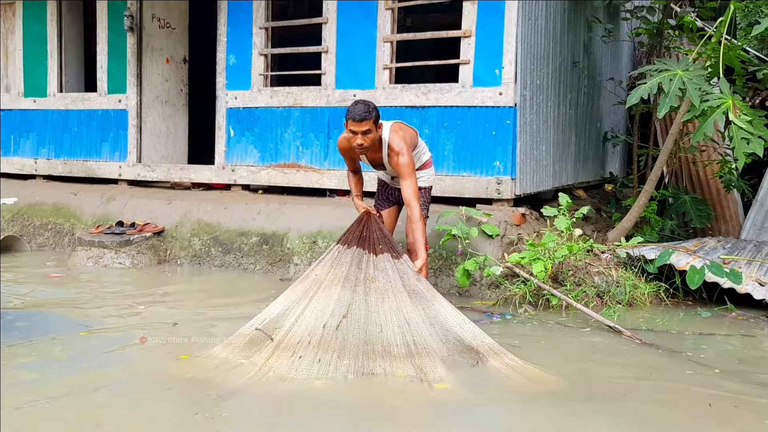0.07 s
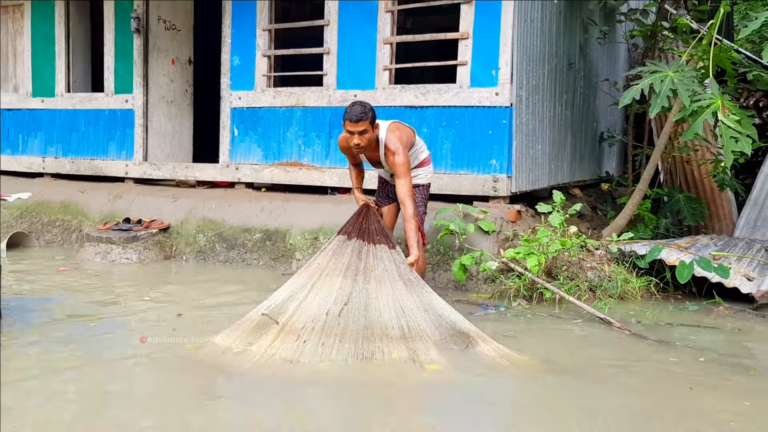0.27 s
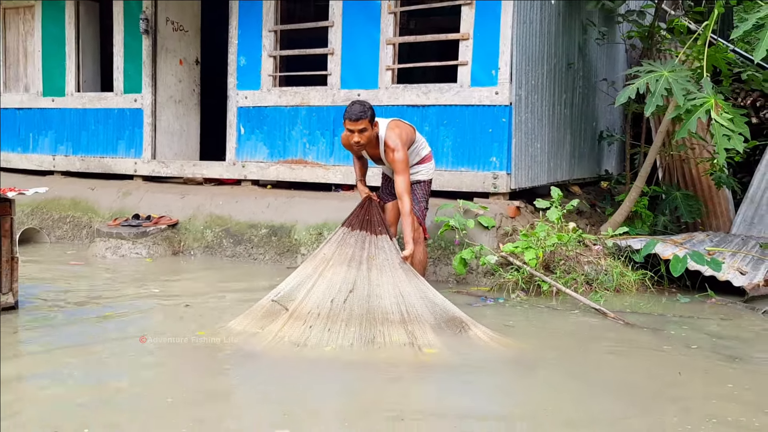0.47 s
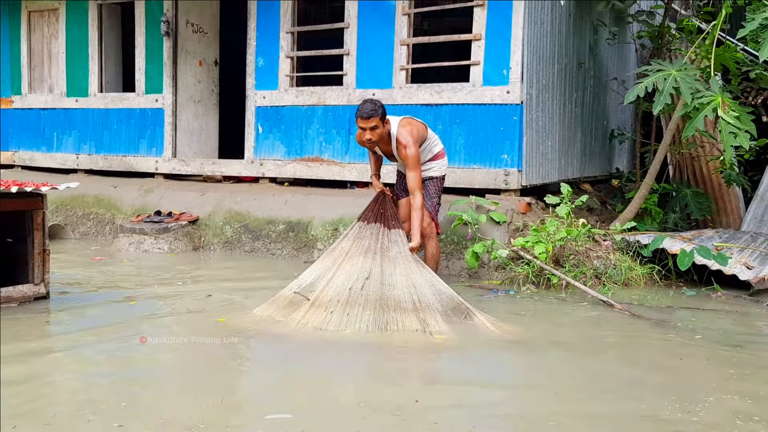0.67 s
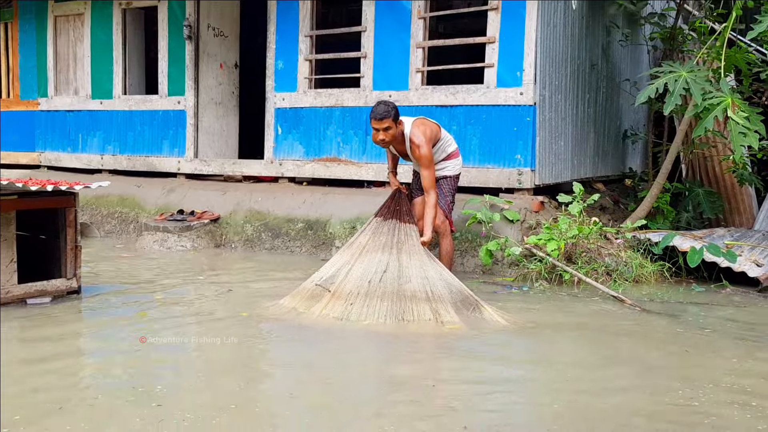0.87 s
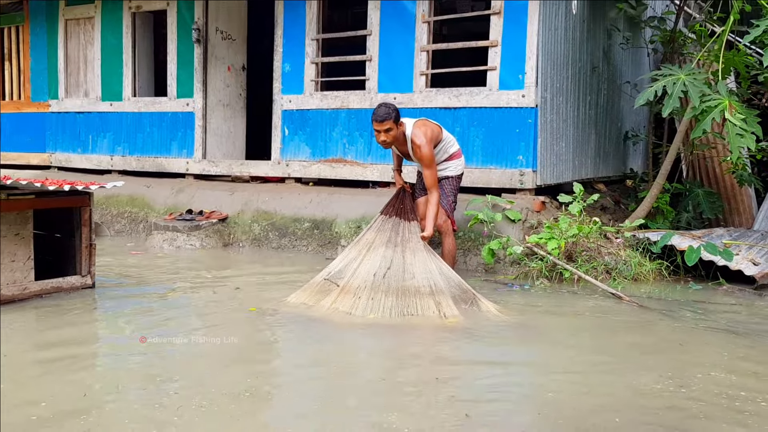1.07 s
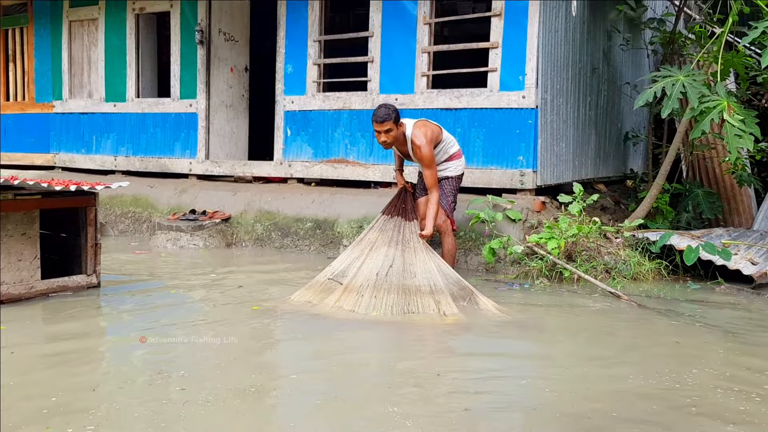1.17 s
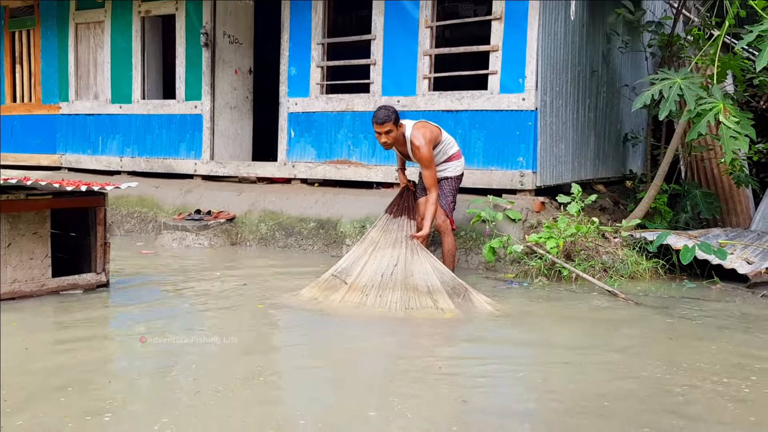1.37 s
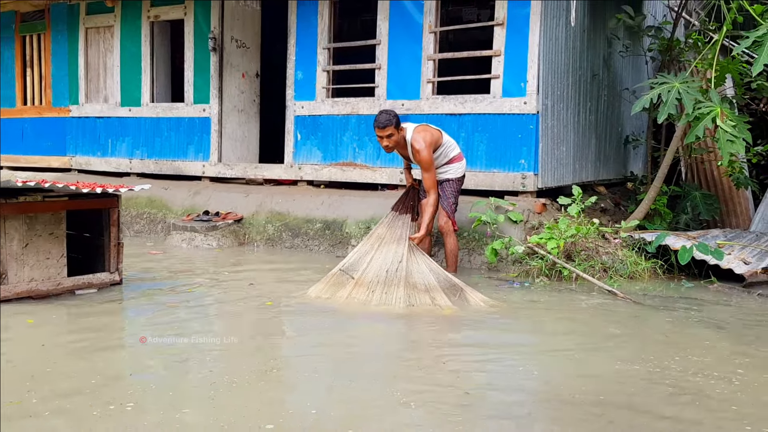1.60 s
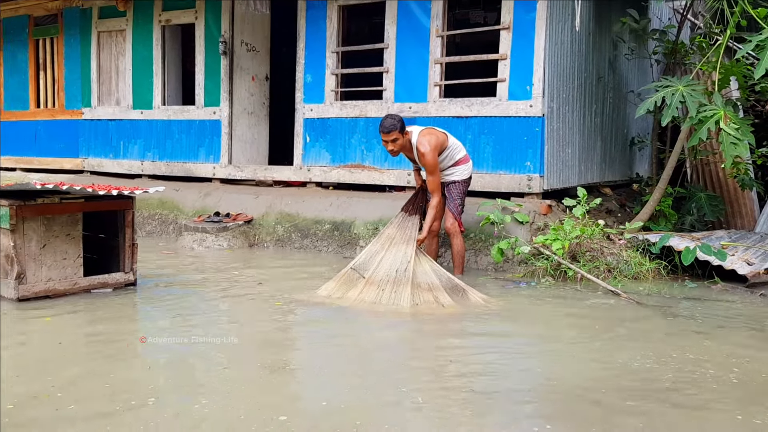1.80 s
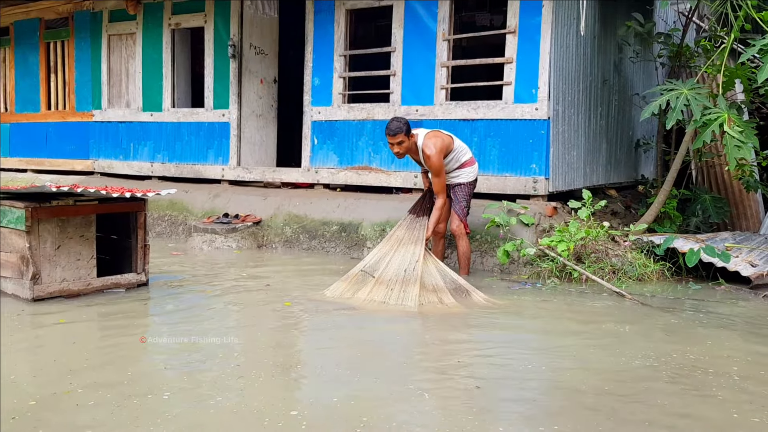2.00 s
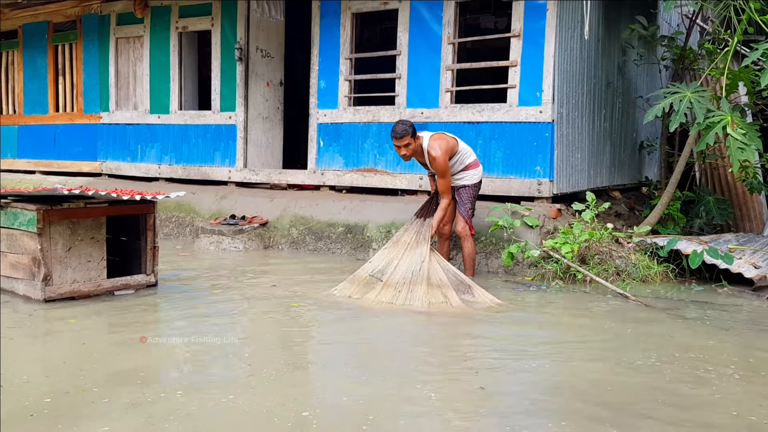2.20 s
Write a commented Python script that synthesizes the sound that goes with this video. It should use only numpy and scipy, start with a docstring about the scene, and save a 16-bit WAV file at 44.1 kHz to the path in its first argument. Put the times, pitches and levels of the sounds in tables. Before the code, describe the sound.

Shallow water sloshes and gurgles as a net is drawn in outdoors, a few metres from the microphone. Light drips lead into one splashy pull and a slightly softer second, then scattered drops fall back over quiet open air.

```python
"""Light drips and bubbling, then a cast net hauled through shallow floodwater in two pulls.
A few metres from a stereo pair of microphones, each pull churns up deep gulps and a crowd of
bubbles while spray patters off the mesh; afterwards single drips plop back. A house wall returns
a short wash. Behind it all lie a low outdoor rumble and two faint, far whistles."""
import sys
import numpy as np
from scipy import signal
from scipy.fft import rfft, irfft
from scipy.io import wavfile

SR = 44100
rng = np.random.default_rng(int(sys.argv[2]) if len(sys.argv) > 2 else 0)


def output_pcm(signal):
    """Save a mono or channel-first signal as 16-bit PCM at the path in sys.argv[1].

    Samples are clipped to [-1, 1] before scaling.
    """
    pcm = np.clip(np.atleast_2d(signal).T, -1, 1) * 32767
    wavfile.write(sys.argv[1], SR, np.round(pcm).astype(np.int16))


N = 99225
TIME = np.arange(N) / SR
HZ = np.fft.rfftfreq(N, 1 / SR)

# Table levels are relative: each layer's gain and placing come on top.
# outdoor rumble and hiss: frequency_hz, level_db
AIR_SPECTRUM = [(20, -48), (40, -10.5), (68, -2), (95, -1.5), (130, -10.5), (200, -9.5), (400, -16.5),
                (1000, -25), (2500, -43), (6000, -33.5), (9000, -35), (12500, -28.5), (16000, -35)]
# how alike the air is at the two microphones: frequency_hz, correlation
AIR_LIKENESS = [(30, 0.74), (80, 1), (200, 0.11), (1000, 0.067), (4000, 0.057), (16000, .05)]
# soft thuds and hollow rings of heaving water: start_s, pitch_hz, level_db, decay_s, glide_share
WATER_THUDS = [(.316, 663, -10.5, 0.0038, -0.027), (.345, 446, -26, 0.028, -0.018),
               (0.582, 171, -23, 0.0057, .1), (.805, 269, -29, 0.015, 0.12), (1.8, 61, -29.5, 0.019, -.1),
               (2.039, 77.4, -32.5, 0.028, -0.017)]
# far whistles: start_s, length_s, start_pitch_hz, end_pitch_hz, level_db, pure_tone_gain
FAR_WHISTLES = [(1.567, .2, 2397, 3494, -38.5, 0.7), (1.708, 0.232, 4650, 4880, -43.5, .35)]
# tail scattered around the yard: frequency_hz, level_db
YARD_SPECTRUM = [(100, -10), (400, -9), (1000, -1.5), (2500, -6), (16000, 0.5)]
# where the water sits between the microphones: frequency_hz, left_over_right_db
WATER_BALANCE = [(100, 6), (400, 1.1), (1000, 2), (2000, 2), (3500, 1.5), (6000, 1), (9500, 5), (12500, -2),
                 (15000, -6)]
# spray off the mesh: time_s, level_db
SPRAY_ENVELOPE = [(0, -43), (.09, -43.5), (.12, -50), (.195, -44), (.22, -32), (.35, -25), (.44, -26),
                  (.55, -26.5), (.62, -26.5), (.78, -24), (.86, -27), (.945, -37), (1.015, -32.5),
                  (1.08, -31), (1.4, -29.5), (1.55, -37), (1.8, -47), (2.25, -48.5)]
# tone of the spray: frequency_hz, level_db
SPRAY_SPECTRUM = [(300, -14), (1200, -5), (2600, -1.5), (3800, -2.5), (5200, -7), (7000, -11.5),
                  (8500, -9.5), (11000, -10), (13000, -7), (16000, -19)]
# drops and sheets hitting the surface: start_s, level_db, decay_s, left_over_right_db, centre_hz
SURFACE_SMACKS = [(.209, -21, 0.002, 2, 5550), (0.207, -18, 0.0033, 3, 2630),
                  (.278, -19, 0.00091, -2, 13500), (0.303, -15, 0.0091, 5, 1920),
                  (0.307, -13.5, 0.0083, 1, 3520), (0.351, -16.5, 0.0029, 4, 6660),
                  (0.435, -6, 0.0031, 2, 740), (0.436, -18, .004, -5, 4000), (0.502, -18, 0.0038, 11, 8700),
                  (.573, -18, 0.0022, 7, 7800), (.620, -15.5, .003, -1, 3660),
                  (0.647, -17, 0.0021, 6, 8900), (0.698, -13, 0.0019, 5, 5060),
                  (0.736, -12, 0.0022, -2, 4300), (0.752, -12.5, 0.0025, 3, 9800),
                  (0.7659, -16, 0.0022, 12.5, 7800), (0.823, -20, 0.0009, 9, 12500),
                  (0.912, -19.5, 0.0045, 3, 4260), (.9613, -22, 0.0035, 0, 12000),
                  (0.988, -31, .0015, 0, 12500), (0.993, -31, .003, -3, 10000),
                  (1.034, -21, 0.0027, -5, 13000), (1.078, -27, 0.0088, 3, 1000),
                  (1.0824, -22.5, 0.0085, -2, 9800), (1.093, -18.5, 0.0028, 1, 5740),
                  (1.125, -23, 0.0051, -3, 5970), (1.154, -18.5, 0.0039, -1, 5000),
                  (1.1583, -23, 0.0012, -12, 13100), (1.1921, -21, 0.0043, -5, 6240),
                  (1.223, -19, 0.013, -2, 2070), (1.281, -16, 0.0012, 3, 9200),
                  (1.404, -15.5, 0.0029, -5, 2750), (1.462, -15, 0.0007, -7, 12300),
                  (1.682, -27, 0.0087, 2, 950), (1.7233, -28, .001, -5, 12500),
                  (1.759, -27, .001, -12, 11000), (1.988, -30, 0.012, -3, 2580),
                  (2.0124, -16.5, 0.0018, -7, 11200), (2.0136, -19, 0.001, 3, 4130)]
# large single bubbles and drips: start_s, pitch_hz, level_db, decay_s, glide_share
SINGLE_PLOPS = [(0.009, 1090, -28.5, 0.013, 0.22), (0.0944, 1424, -27.5, 0.0061, -0.038),
                (0.1279, 640, -31.5, 0.021, -0.049), (0.2045, 1545, -23, 0.011, -0.24),
                (0.215, 1440, -13.5, 0.0013, -0.15), (0.2268, 2044, -13, 0.0035, 0.098),
                (0.2492, 2000, -20, 0.0015, 0.022), (0.2737, 1567, -18, 0.0059, 0.11),
                (0.309, 1590, -6.5, 0.0013, -0.32), (0.31, 472, -7, 0.011, -0.16),
                (0.3104, 704, -0.5, 0.0015, -0.063), (0.3518, 1410, -1.5, 0.002, 0.11),
                (0.3993, 1190, -11.5, 0.0018, -0.039), (0.442, 906, -11, 0.014, 0.19),
                (0.4714, 922, -13, 0.011, -0.0075), (0.5023, 1160, -10, 0.0081, -0.13),
                (0.5824, 318, -7, 0.012, 0.25), (0.588, 668, -11, 0.013, -0.063),
                (0.6198, 1012, -3, 0.004, 0.017), (0.641, 538, -7, 0.0058, -0.14),
                (0.6664, 614, -12, 0.0065, 0.25), (0.6832, 2420, -9.5, 0.0014, 0.1),
                (0.6848, 910, -15, 0.011, -0.086), (0.72, 820, -13, 0.0055, 0.02),
                (0.7514, 445, -10.5, 0.0047, -0.16), (0.765, 1390, -17.5, 0.017, 0.34),
                (0.7792, 356, -15.5, 0.0075, -0.18), (0.7823, 832, -12, 0.0062, 0.26),
                (0.7993, 1180, -10, 0.0018, -0.18), (0.8508, 990, -11.5, 0.0031, 0.042),
                (0.9651, 870, -12, 0.0028, 0.25), (0.983, 1690, -17, 0.0028, 0.13),
                (0.998, 1490, -18, 0.008, 0.066), (1.0468, 1020, -14.5, 0.0018, -0.12),
                (1.078, 825, -14, 0.005, -0.22), (1.204, 400, -13.5, 0.004, -0.2),
                (1.207, 1960, -12, 0.002, -0.047), (1.2293, 1850, -9, 0.0032, -0.11),
                (1.246, 920, -14.5, 0.0075, 0.0079), (1.2784, 405, -13, 0.011, -0.12),
                (1.28, 1250, -11, 0.0022, -0.23), (1.323, 977, -11.5, 0.0052, 0.031),
                (1.354, 427, -7.5, 0.0051, 0.066), (1.3844, 438, -12, 0.01, -0.03),
                (1.4119, 1020, -6, 0.0034, 0.083), (1.4623, 1140, -10.5, 0.0021, 0.2),
                (1.4976, 990, -11, 0.0034, -0.041), (1.6244, 1880, -21, 0.0029, 0.0075),
                (1.6827, 704, -26.5, 0.011, -0.0072), (1.7244, 1800, -27, 0.0021, 0.096),
                (1.7613, 1950, -32, 0.016, 0.11), (1.7922, 853, -21.5, 0.007, 0.2),
                (1.839, 524, -24, 0.0073, 0.14), (1.9948, 2500, -21, 0.0013, -0.043),
                (2.0482, 2590, -30, 0.0025, 0.074), (2.0948, 1630, -32, 0.0033, -0.033),
                (2.1512, 1365, -21, 0.0028, -0.051), (2.1944, 867, -13.5, 0.0036, -0.3),
                (2.205, 742, -23, 0.013, 0.18), (2.215, 1860, -33.5, 0.011, -0.23)]
# knots of bubbles that break together: middle_s, length_s, pitch_hz, level_db
BUBBLE_KNOTS = [(0.234, 0.039, 2150, -29.5), (.35, 0.0082, 1550, -18), (0.43, 0.028, 1170, -20.5),
                (.8, 0.019, 1630, -22), (.922, .02, 1760, -32.5), (1.028, 0.034, 1930, -27.5),
                (1.088, 0.027, 2200, -30), (1.111, 0.0095, 1760, -26), (1.169, 0.02206, 1090, -23.5),
                (1.233, 0.022, 1820, -24.5), (1.289, 0.031, 840, -30), (1.398, .025, 1090, -33),
                (1.446, 0.036, 390, -32.5), (1.828, 0.048, 890, -40), (1.862, 0.024, 1860, -48),
                (2.048, 0.041, 930, -51.5)]
# churn of small bubbles: time_s, level_db
BUBBLE_ENVELOPE = [(0, -39.5), (.09, -39), (.12, -48.5), (.195, -47), (.22, -49), (.29, -25), (.42, -27),
                   (.54, -26), (.66, -25), (.8, -21.5), (.94, -33), (1.06, -31), (1.23, -26.5),
                   (1.48, -28.5), (1.6, -31.5), (1.7, -47), (1.95, -53.5), (2.25, -52.5)]
# tone of the small bubbles: frequency_hz, level_db
BUBBLE_SPECTRUM = [(300, -21), (600, -7.5), (950, -4.5), (1300, -5), (1700, -4), (2400, -7), (3500, -17.5),
                   (6000, -14), (16000, -60)]
# deep gulps through the two pulls: time_s, level_db
GULP_ENVELOPE = [(0, -45), (.22, -57), (.33, -33.5), (.53, -33), (.6, -24.5), (.8, -23.5), (.91, -37.5),
                 (1.02, -55), (1.05, -31), (1.19, -30.5), (1.28, -30.5), (1.44, -26), (1.5, -35.5),
                 (1.7, -47.5), (1.84, -41), (1.94, -53), (2.25, -81)]
# tone of the gulps: frequency_hz, level_db
GULP_SPECTRUM = [(100, 4), (200, -8.5), (290, -3.5), (420, -0.5), (600, 2), (800, -0.5), (1200, -20),
                 (3000, -45)]
# the gulps sink in pitch as each pull lifts more water: time_s, pitch_hz
GULP_PITCH_CURVE = [(.1, 690), (.45, 624), (.6, 466), (.82, 460), (.95, 640), (1.1, 700), (1.25, 470),
                    (1.44, 407), (1.55, 643), (1.85, 567)]


def amp(db):
    """Decibels to gain."""
    return 10 ** (np.asarray(db) / 20)


def unit(x):
    """Scales to rms 1."""
    return x / np.sqrt(np.mean(x ** 2) + 1e-20)


def over_hz(points):
    """Spreads a table over the frequency grid, on a log axis."""
    hz, value = np.transpose(points)
    return np.interp(np.log(HZ + 1), np.log(hz), value)


def colour(x, spectrum):
    """Filters by a spectrum table, keeping the power of white noise."""
    return irfft(rfft(x) * unit(amp(over_hz(spectrum))), N)


def envelope(points):
    """A level curve as gain per sample."""
    return amp(np.interp(TIME, *np.transpose(points)))


def slow_noise(shape, width_hz):
    """A random flutter, mostly slower than width_hz, at rms 1."""
    return unit(irfft(rfft(rng.standard_normal(shape)) * np.exp(-(HZ / width_hz) ** 2), N))


def pan(left_db):
    """Gains at the left and right microphones."""
    return amp([[left_db / 2], [-left_db / 2]])


def add(mix, start_s, sound):
    """Mixes a sound in, trimming what falls outside the mix."""
    at = round(start_s * SR)
    sound = sound[..., max(-at, 0):]
    part = mix[..., max(at, 0):][..., :sound.shape[-1]]
    part += sound[..., :part.shape[-1]]


def bubble(peak_s, pitch_hz, level_db, decay_s, glide, rise_cycles=1.226):
    """A pocket of air swells, then rings down as its pitch slides. Returns start time and sound."""
    lead_s = 2 * rise_cycles / pitch_hz
    t = np.arange(-lead_s, 6 * decay_s, 1 / SR)
    shape = np.exp(np.where(t < 0, -(t * pitch_hz / rise_cycles) ** 2, -t / decay_s))
    cycles = np.cumsum(pitch_hz * (1 + glide * np.tanh(t / decay_s / 2))) / SR
    return peak_s - lead_s, amp(level_db) * shape * np.sin(2 * np.pi * cycles)


def bubble_stream(per_s, pitch_curve, pitch_spread, ring_cycles, spread_db, glide, width_db, count):
    """Bubbles of random size and place ring around a pitch curve (time_s, pitch_hz), at rms 1."""
    out = np.zeros((2, N))
    draws = rng.random((count, 6))
    times = (np.arange(count) + 2 * draws[:, 0] - 1) / per_s
    pitches = np.interp(times, *np.transpose(pitch_curve)) * (1 + pitch_spread * (2 * draws[:, 1] - 1))
    for peak_s, hz, (size, ring, slide, side) in zip(times[times < N / SR], pitches, draws[:, 2:]):
        decay_s = ring_cycles * (.5 + ring) / hz
        own_glide = glide * (2 * slide - .5)  # most slide upward
        start_s, sound = bubble(peak_s, hz, spread_db * size ** 2, decay_s, own_glide, rise_cycles=1.154)
        add(out, start_s, sound * pan(width_db * (2 * side - 1)))
    return unit(out)


def outdoor_air(level_db=-39):
    """Open air all round: a low rumble that both microphones share, and a thin, wide hiss."""
    left, other = rfft(rng.standard_normal((2, N)))
    likeness = over_hz(AIR_LIKENESS)
    right = likeness * left + np.sqrt(1 - likeness ** 2) * other
    return amp(level_db) * colour(irfft(np.array([left, right]), N), AIR_SPECTRUM)


def far_whistles(halo_width_hz=520):
    """Faint whistles rise and swell early, then trail off: a thin tone in a halo blurred by distance."""
    out = np.zeros((2, N))
    for start_s, length_s, start_hz, end_hz, level_db, pure_gain in FAR_WHISTLES:
        progress = np.clip((TIME - start_s) / length_s, 0, 1) ** 0.61
        swell = np.sin(np.pi * progress) ** 2
        phase = 2 * np.pi * np.cumsum(start_hz + (end_hz - start_hz) * progress) / SR
        halo = slow_noise((2, N), halo_width_hz / 2) * np.sin(phase)
        out += amp(level_db) * swell * (halo + pure_gain * np.cos(phase))
    return out


def yard(direct, tail_db=-4.5, t60_s=0.11, shared=0.35):
    """Direct sound plus a short tail scattered by the water and house wall, partly alike at both mics."""
    noise = rng.standard_normal((2, N)) + shared * rng.standard_normal(N)
    tail = (colour(noise, YARD_SPECTRUM) * amp(-60 * TIME / t60_s))[:, :SR // 2]
    wash = signal.fftconvolve(direct, tail / np.linalg.norm(tail[0]), axes=1)[:, :N]
    return direct + amp(tail_db) * wash


def thuds():
    """The heaving water gives a few soft thuds and hollow rings."""
    out = np.zeros(N)
    for row in WATER_THUDS:
        add(out, *bubble(*row, rise_cycles=0.598))
    return out


def pings(gain_db=-12):
    """The tiniest bubbles ring for a moment inside the spray."""
    tiny = bubble_stream(per_s=330, pitch_curve=[(0, 7000)], pitch_spread=0.68, ring_cycles=8.3,
                         spread_db=11, glide=0.075, width_db=8, count=1200)
    return amp(gain_db) * unit(colour(tiny, SPRAY_SPECTRUM)) * envelope(SPRAY_ENVELOPE)


def spray(per_s=500, spread_db=4, burst_s=0.0012, clump_db=3.5, clump_s=0.029, bands=8):
    """The mesh sheds droplets in clumps: tiny bursts in each band and broad spatters, over a fine fizz."""
    fizz, spatter, shared = 0.36, 0.43, 0.38
    centres_hz = np.geomspace(1500, 14000, bands)
    hits = rng.random((bands + 1, N)) < per_s / SR
    sizes = np.minimum(rng.exponential(1, (bands + 1, N)), 4)
    hit_power = hits * amp(spread_db * sizes) ** 2
    bursts = signal.lfilter([1], [1, -np.exp(-1 / (burst_s * SR))], hit_power)
    broad_bursts, *band_bursts = bursts / bursts.mean()
    spectrum = 0
    for band, own_bursts in zip(np.eye(bands), band_bursts):
        noise = rng.standard_normal((2, N)) + shared * rng.standard_normal(N)
        clumps = unit(amp(clump_db * slow_noise(N, 1 / clump_s)))
        power = (own_bursts + fizz) * clumps ** 2 + spatter * broad_bursts
        band_gain = np.sqrt(np.interp(HZ, centres_hz, band))
        spectrum += rfft(noise * np.sqrt(power)) * band_gain
    return unit(irfft(spectrum * amp(over_hz(SPRAY_SPECTRUM)), N)) * envelope(SPRAY_ENVELOPE)


def smacks(gain_db=-3.5, rise_s=0.00067, width_octaves=0.29, skirt_db=-3, top_hz=15700):
    """Falling water hits the surface in sharp bursts, each brightest around its own frequency."""
    out = np.zeros((2, N))
    t = np.arange(-128, 1920) / SR
    hz = np.fft.rfftfreq(len(t), 1 / SR) + 1
    for start_s, level_db, decay_s, left_db, centre_hz in SURFACE_SMACKS:
        peak = np.exp(-(np.log2(hz / centre_hz) / width_octaves) ** 2)
        skirt = amp(skirt_db) * np.minimum(hz / centre_hz, centre_hz / hz)
        band = (peak + skirt) / (1 + (hz / top_hz) ** 20)
        burst = unit(irfft(rfft(rng.standard_normal((2, len(t)))) * band))
        shape = np.exp(np.where(t < 0, -(t / rise_s) ** 2, -t / decay_s))
        add(out, start_s + t[0], amp(level_db) * pan(left_db) * shape * burst)
    return amp(gain_db) * out


def plops(gain_db=-2):
    """Large bubbles and drips ring out one by one."""
    out = np.zeros(N)
    for row in SINGLE_PLOPS:
        add(out, *bubble(*row))
    return amp(gain_db) * out


def gurgles(pitch_spread=0.31, ring_cycles=1.7, glide=0.16, count=12):
    """A fold of mesh breaks the surface and lets go a quick run of like-sized bubbles."""
    out = np.zeros(N)
    for middle_s, length_s, pitch_hz, level_db in BUBBLE_KNOTS:
        knot = np.zeros(N)
        for k, (late, detune, strength) in enumerate(rng.random((count, 3))):
            hz = pitch_hz * (1 + pitch_spread * (2 * detune - 1))
            peak_s = middle_s + length_s * ((k + late) / count - .5)
            start_s, sound = bubble(peak_s, hz, 0, ring_cycles / hz, glide)
            add(knot, start_s, (.5 + strength) * sound)
        out += amp(level_db) * unit(knot) * np.sqrt(length_s * SR / N)  # level over the knot's length
    return out


def small_bubbles():
    """The mesh combs small bubbles into the surface."""
    small = bubble_stream(per_s=1500, pitch_curve=[(0, 2300)], pitch_spread=0.72, ring_cycles=3.27,
                          spread_db=10, glide=0.2, width_db=2, count=4500)
    return unit(colour(small, BUBBLE_SPECTRUM)) * envelope(BUBBLE_ENVELOPE)


def gulps():
    """Big air pockets collapse behind the net's weighted rim."""
    pockets = bubble_stream(per_s=250, pitch_curve=GULP_PITCH_CURVE, pitch_spread=0.486, ring_cycles=1.73,
                            spread_db=9, glide=0.18, width_db=0, count=1100)
    return unit(colour(pockets, GULP_SPECTRUM)) * envelope(GULP_ENVELOPE)


def scene(plop_dry_share=0.28, left_lag_s=0.00004):
    """The net a few metres off, near the centre, in an open yard; big plops arrive more directly."""
    drips = plops()
    churn = gulps() + small_bubbles() + gurgles() + spray() + pings()
    water = yard(churn + (1 - plop_dry_share) * drips) + plop_dry_share * drips
    sides = np.array([[.5], [-.5]])
    balance = amp(sides * over_hz(WATER_BALANCE))
    lag = np.exp(-2j * np.pi * HZ * sides * left_lag_s)  # the left microphone hears the water later
    water = irfft(rfft(water) * balance * lag, N)
    return water + smacks() + far_whistles() + (outdoor_air() + thuds()) * pan(left_db=0.2)


def record(dry):
    """The microphones' band limit, at 15.9 kHz."""
    lowpass = signal.firwin(511, 15900, window=("kaiser", 9), fs=SR)
    return signal.oaconvolve(dry, lowpass[None], "same")


dry = scene()
out = record(dry)
output_pcm(out)
```